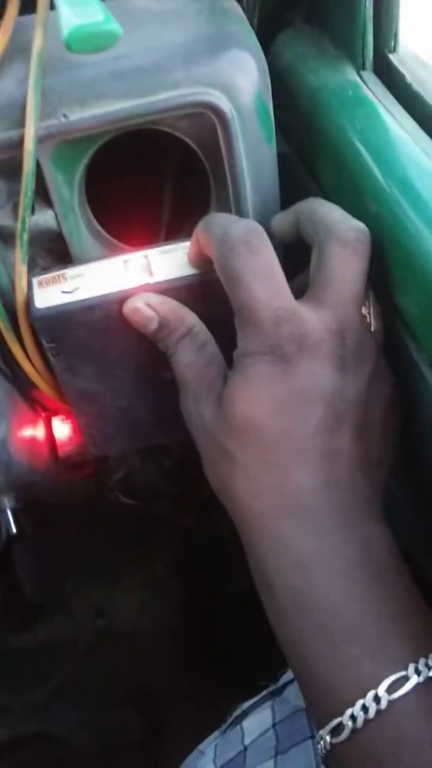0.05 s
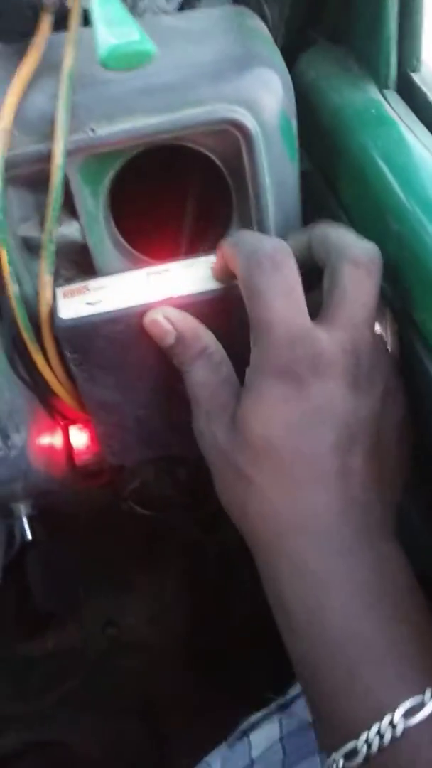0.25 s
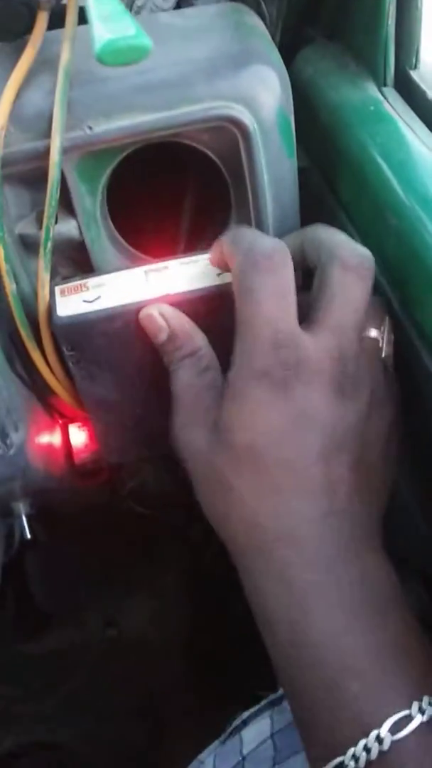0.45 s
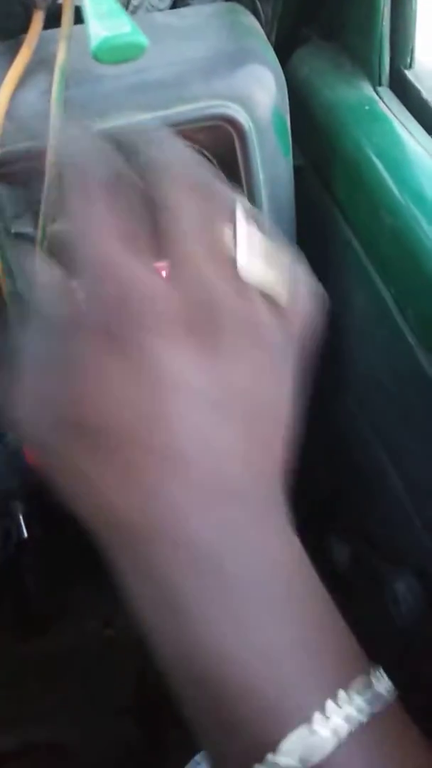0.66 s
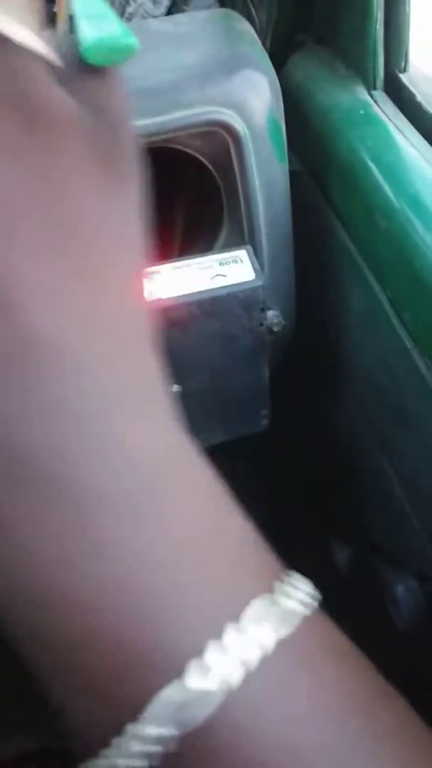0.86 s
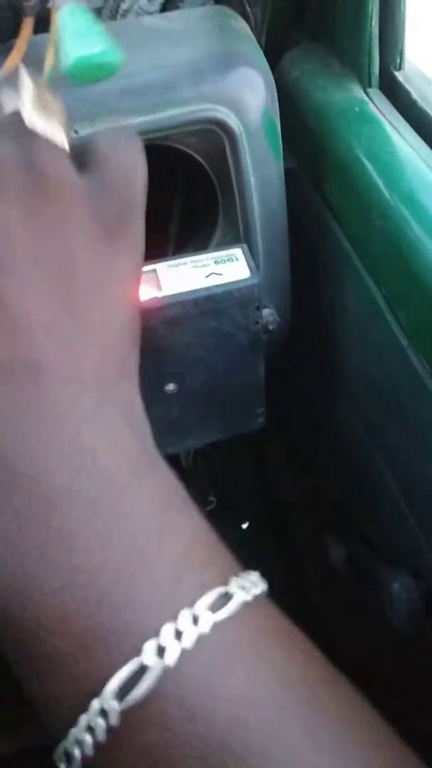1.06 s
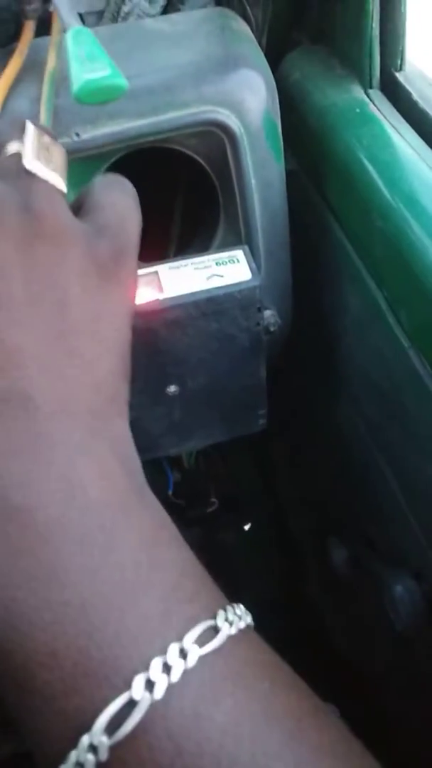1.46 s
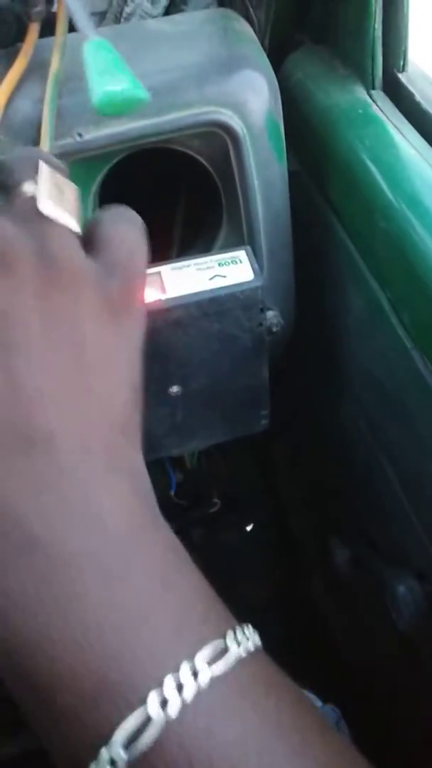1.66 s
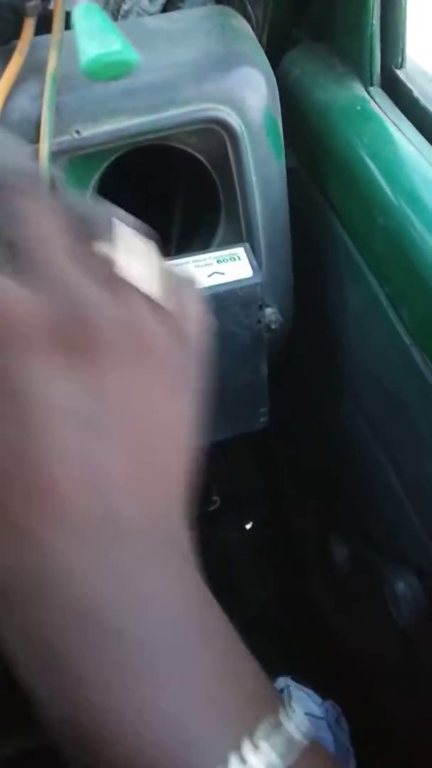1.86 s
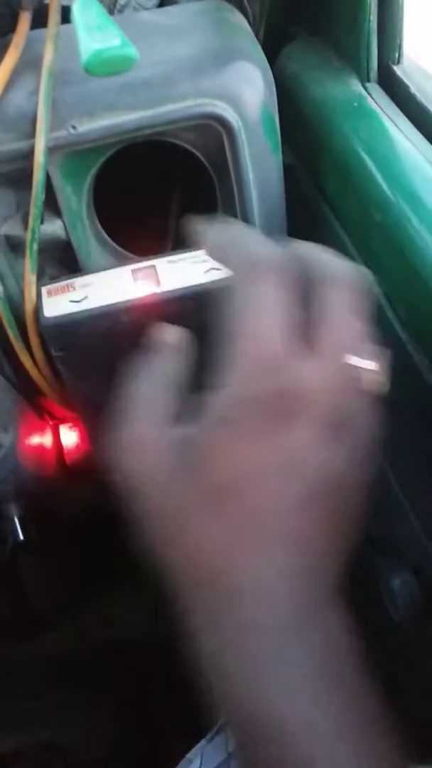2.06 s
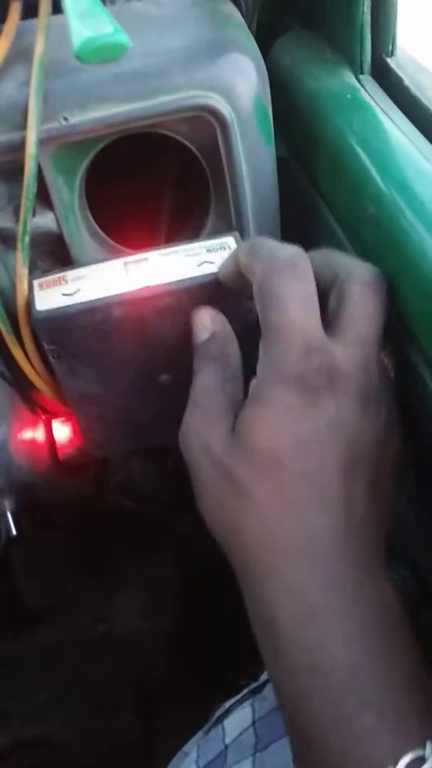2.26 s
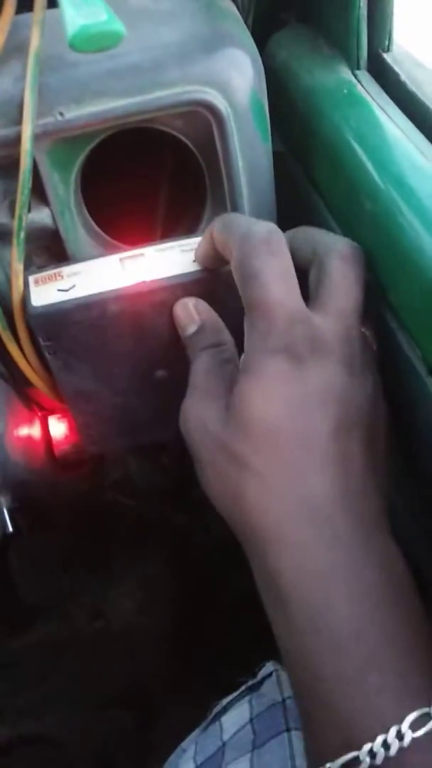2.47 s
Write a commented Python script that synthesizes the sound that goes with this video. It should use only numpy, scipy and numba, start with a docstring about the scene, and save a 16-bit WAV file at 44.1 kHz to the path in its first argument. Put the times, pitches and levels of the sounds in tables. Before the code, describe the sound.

One bright, brassy air horn blast cuts through diesel idle rumble in a vehicle cab.

```python
"""A diesel idles, heard inside the cab: boom, rumble and clatter. Then one blast of a two-trumpet air horn.
Air on a diaphragm drives each trumpet. The low one speaks first, bright and brassy;
the high one joins a third above and takes over. Both stop as their shared valve shuts.
A gain control ducks the engine under the blast and lets it swell back afterwards."""
import sys
import numpy as np
from scipy import signal
from scipy.fft import rfft, irfft
from scipy.io import wavfile
from scipy.ndimage import uniform_filter1d
from numba import njit

SR = 44100
rng = np.random.default_rng(int(sys.argv[2]) if len(sys.argv) > 2 else 0)


def materialize(psi):
    """Save the field psi as 16-bit PCM at rate SR to the path in sys.argv[1].

    A 1-D psi becomes a single channel; in a 2-D psi each row is a channel.
    """
    bounded = np.clip(np.atleast_2d(psi).T, -1, 1)
    quanta = np.round(bounded * 32767).astype(np.int16)
    wavfile.write(sys.argv[1], SR, quanta)


N = 110250

LOW_HZ, HIGH_HZ, TOP_HZ = 577.7, 732.8, 15450
LOW_ON_S, HIGH_ON_S, VALVE_SHUT_S = 1.076, 1.130, 2.240


def undb(db):
    """Decibels to gain."""
    return 10 ** (np.asarray(db) / 20)


def unit(x):
    """Scale to rms 1."""
    return x / np.sqrt(np.mean(x ** 2))


def lookup(f, table):
    """Level/dB from a table, interpolated over log frequency or log harmonic number."""
    points, db = np.array(table, float).T
    return np.interp(np.log(np.maximum(f, 1)), np.log(points), db)


def colour(x, table):
    """Filter by a table of f/Hz, gain/dB."""
    return irfft(rfft(x) * undb(lookup(np.arange(N // 2 + 1) * SR / N, table)), N)


def noise(table):
    """Noise with the given spectrum, rms 1."""
    return unit(colour(rng.standard_normal(N), table))


def walk(rate_hz):
    """Smooth random wander, rms 1."""
    hold = max(int(SR / rate_hz), 1)
    steps = np.repeat(rng.standard_normal(N // hold + 1), hold)
    return unit(uniform_filter1d(uniform_filter1d(steps, hold), hold)[:N])


def engine(t):
    """Idling diesel: the cab booms on a few lines; rumble and clatter pulse with the firings."""
    # cab boom lines: f/Hz, relative level/dB
    boom_lines = [(26.6, -19), (73.3, 0), (120.3, -8), (145.5, -13), (220.2, -4), (294, -13), (372, -2),
                  (441.5, -13), (624, -17)]
    # engine noise spectra: f/Hz, relative density/dB
    rumble_spectrum = [(20, -32.5), (50, -29.5), (80, -2.5), (130, -1.5), (200, -1.5), (250, -6),
                       (330, -5.5), (410, -2), (520, -7.5), (650, -9.5), (850, -30.5), (1500, -72)]
    clatter_spectrum = [(400, -18), (750, 2), (1000, 1.5), (1500, 0.5), (2200, -1.5), (2800, -7.5),
                        (3600, -8.5), (4600, -14), (6700, -15), (7500, -27.5), (8800, -40), (12000, -54),
                        (15500, -62)]
    # engine envelope: t/s, gain/dB
    envelope = [(0, -11), (.07, -10), (.3, -5), (.63, 0), (.92, 1), (1.05, 1), (1.3, 0), (2.5, 0)]
    firing_hz, boom_db, rumble_db, clatter_db = 46.88, -20.5, -21.5, -27
    phase_per_hz = 2 * np.pi * np.cumsum(1 + 0.00305 * walk(6)) / SR  # idle speed wanders
    boom = sum(undb(db + 0.62 * walk(12.63)) * np.sin(hz * phase_per_hz + rng.uniform(0, 2 * np.pi))
               for hz, db in boom_lines)
    firing = np.cos(firing_hz * phase_per_hz + 0.6 * walk(18))
    rumble = unit(noise(rumble_spectrum) * np.exp(0.36 * firing))
    clatter = unit(noise(clatter_spectrum) * np.exp(0.081 * firing) * undb(0.2 * walk(90)))
    gain = undb(np.interp(t, *np.array(envelope).T))
    return gain * (undb(boom_db) * unit(boom) + undb(rumble_db) * rumble + undb(clatter_db) * clatter)


def diaphragm_phase(t, hz, age_s, shut_s, end_rise):
    """Pitch starts sharp and rough, sags as the air line fills, lifts as the pressure goes."""
    chirp = 0.08 * np.exp(-age_s / 0.0046)
    sag = 0.0077 * np.exp(-((t - 1.15) / 0.077) ** 2)
    slack = 1 - np.exp(-shut_s / 0.0088)
    jitter = 0.0003 * walk(300) + 0.012 * (np.exp(-age_s / 0.012) + slack) * walk(900)
    return 2 * np.pi * np.cumsum(hz * (1 + chirp - sag + end_rise * slack + jitter)) / SR


def trumpet(t, hz, on_s, partials, attack_s, release_s, blare_share, end_rise):
    """Diaphragm and flare: harmonics with air hiss. Returns tone, air, phase, gate."""
    # overtone lift in the first rush of air: f/Hz, gain/dB at full rush
    blare = [(577, 3), (1155, -0.5), (1730, 8), (2300, 4), (3460, 12), (4600, 15), (5200, 15), (5780, 15),
             (6350, 20.5), (6930, 34), (8100, 14.5), (9200, 27.5), (14500, 10.5)]
    # cab colour change as the driver's arm moves: f/Hz, gain/dB
    cab_shift = [(577, 2.5), (733, -0.5), (1155, -3.5), (1465, 0), (1730, -0.5), (2200, 10), (2310, 6.5),
                 (2900, -1.5), (3660, 2.5), (4050, -5.5), (4400, -8), (5130, -3), (5860, -3), (6600, -1.5)]
    # steady air hiss, onset fizz: f/Hz, relative density/dB
    hiss_spectrum = [(300, -15), (700, 0), (1500, -1), (3000, -4), (6500, -9), (8200, -22), (11000, -28),
                     (15500, -30)]
    fizz_spectrum = [(500, -6), (3000, -3), (6500, -2), (8500, -4), (15500, -5)]
    overtone_rise_s, rush_until_s, rush_fall_s = 0.02, 1.145, 0.14
    arm_from_s, arm_to_s = 1.66, 2.05
    age_s, shut_s = np.maximum(t - on_s, 0), np.maximum(t - VALVE_SHUT_S, 0)
    phase = diaphragm_phase(t, hz, age_s, shut_s, end_rise)
    attack, release = np.minimum(age_s / attack_s, 1), np.exp(-shut_s / release_s)
    ring = undb(-20) * np.exp(-shut_s / 0.02)
    opening = np.minimum(age_s / overtone_rise_s, 1)
    rush = blare_share * opening * np.exp(-np.maximum(t - rush_until_s, 0) / rush_fall_s)
    arm = np.clip((t - arm_from_s) / (arm_to_s - arm_from_s), 0, 1)
    tone, power = 0, 0
    for k in range(1, int(TOP_HZ / hz) + 1):
        steady_db = lookup(k, partials)
        waver_db = min(0.19 * k, 3) * walk(5.66)
        db = steady_db + arm * lookup(k * hz, cab_shift) + rush * lookup(k * hz, blare) + waver_db
        decay = np.maximum(release, ring) ** np.cbrt(k)  # upper harmonics die first
        envelope = (attack if k == 1 else opening) * decay
        tone += undb(db) * envelope * np.sin(k * phase + rng.uniform(0, 2 * np.pi))
        power += undb(steady_db) ** 2 / 2
    hiss = undb(-35.5) * noise(hiss_spectrum)
    fizz = undb(-47) * np.exp(-age_s / 0.035) * noise(fizz_spectrum)
    air = opening * release ** 2 * (hiss + fizz)
    return tone / np.sqrt(power), air, phase, attack * release


def buzz(low_phase, high_phase):
    """The two tones mix: faint lines at the sums of their harmonics."""
    # combination tones: f/Hz, relative level/dB
    spectrum = [(1300, -2), (2500, 2), (4000, 0.5), (5000, -7), (6000, 3.5), (6800, -12.5), (7400, -10),
                (8200, -28), (10000, -24), (15000, -38)]
    lines = 0
    for m in range(1, 9):
        for n in range(1, 9):
            db = lookup(m * HIGH_HZ + n * LOW_HZ, spectrum) + 2 * rng.standard_normal()
            lines += undb(db) * np.sin(m * high_phase + n * low_phase + rng.uniform(0, 2 * np.pi))
    return undb(-39) * lines


def horn(t):
    """Two trumpets on one valve; the low one starts with a kick, having all the air at first."""
    # trumpet spectra: harmonic number, relative level/dB
    low_partials = [(1, -1), (2, 2), (3, -1.5), (4, -11), (5, -9), (6, -10.5), (7, -21.5), (8, -17.5),
                    (9, -28.5), (10, -23), (11, -32.5), (12, -39), (13, -45.5), (14, -40), (15, -46),
                    (16, -56), (17, -53.5), (18, -65), (19, -55), (20, -73.5), (21, -80.5), (22, -75.5)]
    high_partials = [(1, 1.5), (2, -11), (3, -22.5), (4, -12.5), (5, -14), (6, -24.5), (7, -15), (8, -23.5),
                     (9, -27), (10, -38), (11, -44), (12, -50), (13, -62), (14, -56), (15, -61.5),
                     (16, -73), (17, -65.5), (18, -56.5), (19, -69), (20, -77), (21, -62)]
    low_db, high_db = -8.5, 2.5
    low, low_air, low_phase, _ = trumpet(
        t, LOW_HZ, LOW_ON_S, low_partials,
        attack_s=0.011, release_s=0.029, blare_share=0.84, end_rise=0.043)
    high, high_air, high_phase, high_gate = trumpet(
        t, HIGH_HZ, HIGH_ON_S, high_partials,
        attack_s=0.021, release_s=0.012, blare_share=0.13, end_rise=0.0216)
    kick_db = 8 * np.exp(-np.maximum(t - LOW_ON_S, 0) / 0.028)
    tones = undb(low_db + kick_db) * low + undb(high_db) * high
    return tones + low_air + high_air + high_gate * buzz(low_phase, high_phase)


@njit
def gain_cut_db(excess_db, attack_s, recover_db_per_s):
    """Gain control: the cut rises quickly to the excess level, falls back at a steady rate."""
    cuts_db, cut_db = np.empty(len(excess_db)), 0.
    for i in range(len(excess_db)):
        if excess_db[i] > cut_db:
            cut_db += (excess_db[i] - cut_db) / (attack_s * SR)
        else:
            cut_db = max(cut_db - recover_db_per_s / SR, 0.)
        cuts_db[i] = cut_db
    return cuts_db


def scene():
    """Horn over idling engine, mono."""
    t = np.arange(N) / SR
    return (horn(t) + engine(t))[None]


def record(dry):
    """Gain control, overload on the highest peaks, low-pass."""
    # colour of the clipping products: f/Hz, gain/dB
    overload = [(100, -17), (700, 7), (2500, 14), (6500, 6), (8200, -16), (11000, -20), (15500, -20.5)]
    ceiling_db, clip_at = -10.5, 0.79
    x = dry[0]
    level_db = 10 * np.log10(np.maximum(uniform_filter1d(x ** 2, size=300), 1e-12))
    x = x * undb(-gain_cut_db(level_db - ceiling_db, attack_s=0.0059, recover_db_per_s=10.5))
    x = x + colour(np.clip(x, -clip_at, clip_at) - x, overload)
    lowpass = signal.ellip(8, 0.2, 70, TOP_HZ, fs=SR, output="sos")
    return signal.sosfilt(lowpass, x)[None]


dry = scene()
out = record(dry)
materialize(out)
```